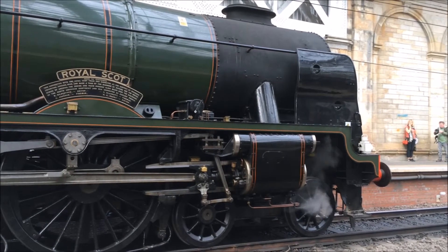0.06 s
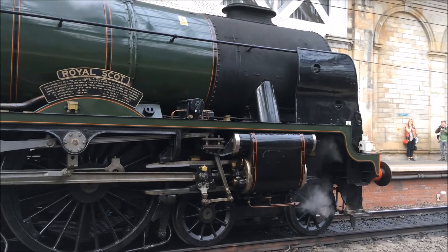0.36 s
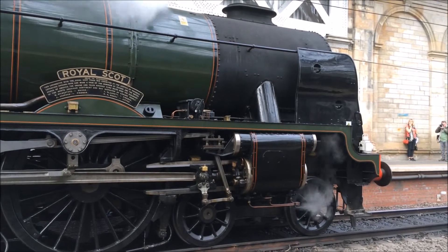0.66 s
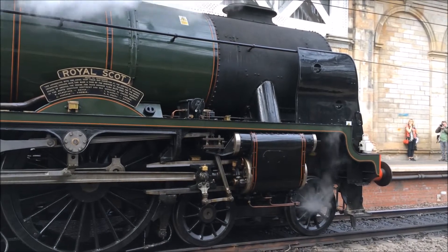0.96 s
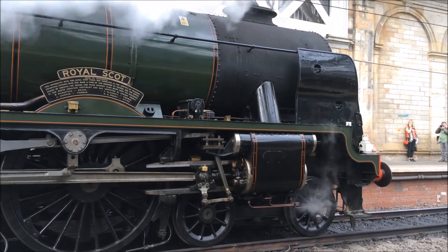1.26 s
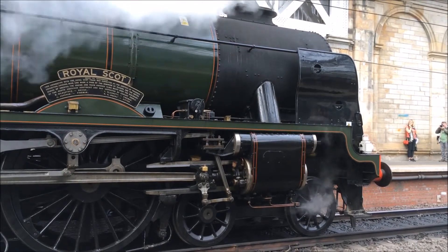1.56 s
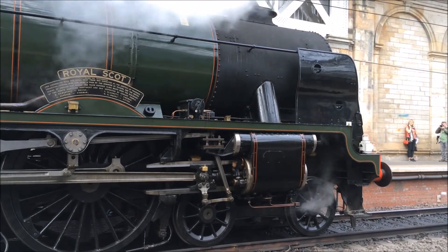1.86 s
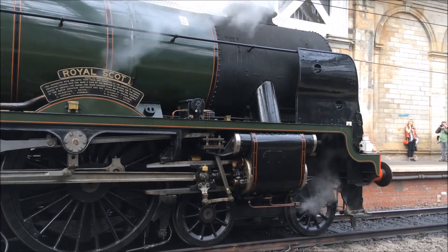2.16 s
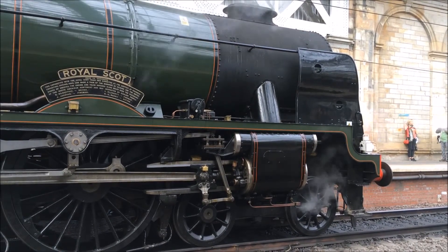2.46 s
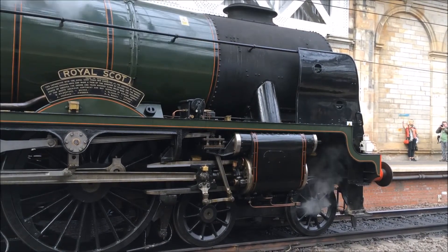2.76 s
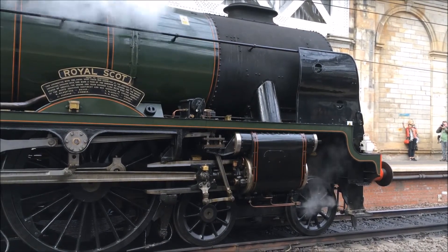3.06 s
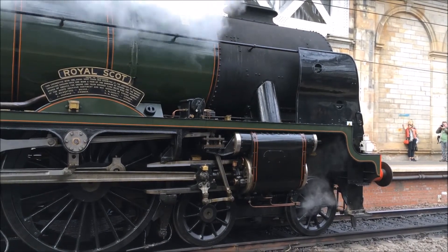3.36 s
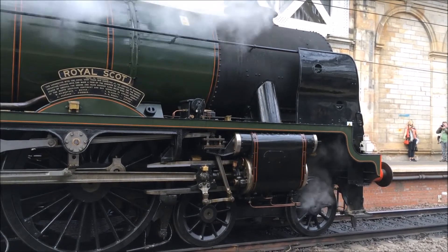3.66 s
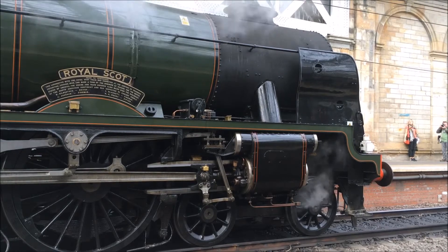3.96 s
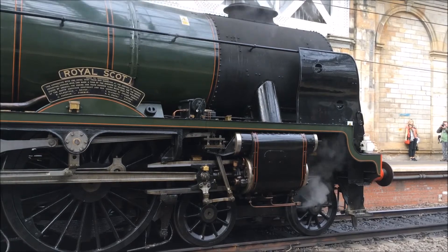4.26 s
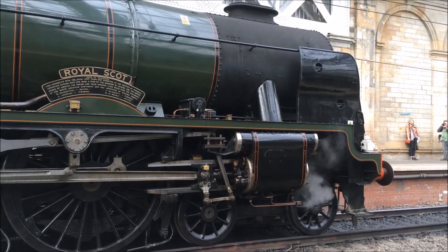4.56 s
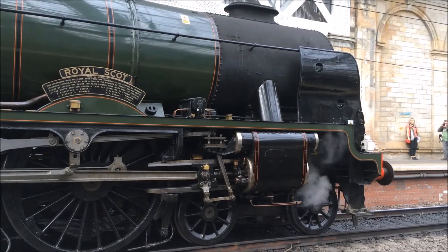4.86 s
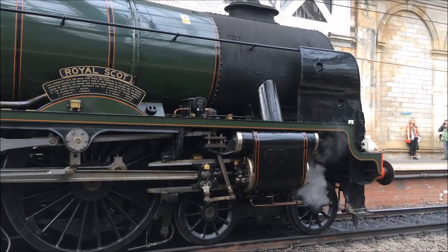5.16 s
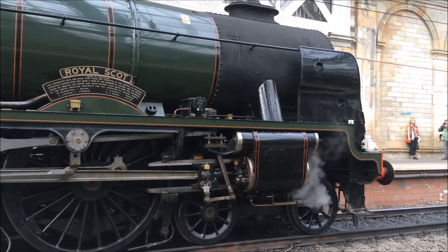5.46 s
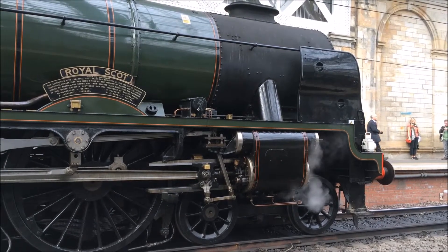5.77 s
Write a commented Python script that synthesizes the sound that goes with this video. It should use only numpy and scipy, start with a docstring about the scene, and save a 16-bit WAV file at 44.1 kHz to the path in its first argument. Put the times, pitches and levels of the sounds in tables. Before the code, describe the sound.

A low steam whistle alternates between a rough, hissing roar and a clear note, ringing through a station before the engine idles softly.

```python
"""A standing steam locomotive sounds its deep whistle, a stopped pipe, under a station roof.
Twice it is overblown: the note goes sharp and breaks up in a roar of steam; between and after,
it speaks clearly. The valve shuts, the station rings on, and the gain control lets up the idling
engine: boiler rumble, a leak and spurts at the cylinder, a few soft puffs.
Now and then the treble dips briefly."""
import sys
import numpy as np
from scipy import signal
from scipy.fft import rfft, irfft, next_fast_len
from scipy.io import wavfile
from scipy.ndimage import uniform_filter1d

SR = 44100
rng = np.random.default_rng(int(sys.argv[2]) if len(sys.argv) > 2 else 0)


def pcm_store(signal):
    """Save signal as 16-bit PCM."""
    levels = np.round(np.clip(np.atleast_2d(signal), -1, 1) * 32767)
    wavfile.write(sys.argv[1], SR, levels.astype(np.int16).T)


N = 261513
TIME = np.arange(N) / SR
SHUT_S = 3.43   # the whistle valve shuts
BREAK_S = 0.054   # how fast the note breaks when overblown
JET_RISE_S, JET_FALL_S = 0.12, 0.32   # the jet swells before the break and dies after the note returns


def from_db(db):
    """Decibels to gain."""
    return 10 ** (np.asarray(db) / 20)


def rms_one(x):
    """Scale to unit rms."""
    return x / np.sqrt(np.mean(x ** 2) + 1e-20)


def at_hz(points, hz):
    """Read a curve on a log-frequency axis."""
    freqs, values = np.transpose(points)
    return np.interp(np.log(hz + 1e-9), np.log(freqs), values)


def drift(rate_hz):
    """Smooth random modulation with a spread of 1."""
    step, warm_up = 20, 4000
    pole = np.exp(-2 * np.pi * rate_hz * step / SR)
    noise = rng.standard_normal(N // step + warm_up + 2)
    slow = signal.lfilter([1], [1, -2 * pole, pole * pole], noise)[warm_up:]
    return np.interp(np.arange(N) / step, np.arange(len(slow)), rms_one(slow))


def turbulence(spectrum, flutter_db, flutter_hz):
    """Coloured noise of rms 1 whose level flutters."""
    size = next_fast_len(N)
    colour = from_db(at_hz(spectrum, np.fft.rfftfreq(size, 1 / SR)))
    noise = irfft(rfft(rng.standard_normal(size)) * colour, size)[:N]
    return rms_one(noise * from_db(flutter_db * drift(flutter_hz)))


def held(spans, rise_s, fall_s):
    """Gate: 1 during each span, with a ramp up before it and a ramp down after it."""
    ramps = [np.minimum(1 + (TIME - start) / rise_s, 1 - (TIME - end) / fall_s)
             for start, end, *_ in spans]
    return np.clip(np.max(ramps, axis=0), 0, 1)


def bursts(rows, rise_s, decay_s):
    """Envelope of short gusts: each swells to its peak and dies away."""
    return sum(from_db(db) * np.clip(1 + (TIME - at) / rise_s, 0, 1)
               * np.exp(-np.maximum(TIME - at, 0) / decay_s) for at, db in rows)


def between(overblown, clear_db, blown_db):
    """Slide from the clear level to the overblown one."""
    return clear_db + (blown_db - clear_db) * overblown


def valve(fade_s, shut_s=SHUT_S):
    """1 while steam flows, fading to 0 at shut_s."""
    return np.clip((shut_s - TIME) / fade_s, 0, 1)


# The boiler's low bed: f/Hz, level/dB
RUMBLE_SPECTRUM = [(25, -29), (55, 1), (90, 2.5), (160, -2.5), (240, -4), (320, -2.5), (600, -12),
                   (1200, -16.5), (2500, -40), (8000, -54)]

def boiler_rumble(level_db=-40.5):
    """The boiler of the resting engine rumbles steadily."""
    return from_db(level_db) * turbulence(RUMBLE_SPECTRUM, flutter_db=0.8, flutter_hz=22)


# The dull colour of a puff: f/Hz, level/dB
PUFF_SPECTRUM = [(110, 5), (250, 5), (400, 13.5), (600, 8), (950, 12.5), (1700, 7), (2400, 0.5), (3500, -7),
                 (8000, -20)]
# Puff cues: t/s, level/dB
PUFFS = [(4.85, -29), (5.05, -41), (5.21, -43.5)]

def steam_puffs():
    """Soft, dull puffs of steam swell and fade."""
    envelope = bursts(PUFFS, rise_s=0.11, decay_s=0.25)
    return envelope * turbulence(PUFF_SPECTRUM, flutter_db=1, flutter_hz=23)


# The leak's thin sizzle: f/Hz, level/dB
LEAK_SPECTRUM = [(500, -9), (2000, 0.5), (3200, -3), (4300, 2.5), (5600, 2.5), (5800, 4), (6000, 0.5),
                 (10000, 0.5), (13000, -0.5), (15500, -3)]
# The hum of the cylinder casing: f/Hz, level/dB
CASING_SPECTRUM = [(120, -27), (195, -8), (232, 3), (265, -14), (400, -31)]
# Spurt cues: t/s, level/dB
SPURTS = [(4.27, -32), (5.82, -34.5)]

def cylinder_leak(leak_db=-42.5, casing_db=-6):
    """Steam leaks and spurts at the cylinder, and the casing hums under it."""
    flow = from_db(leak_db) + bursts(SPURTS, rise_s=0.064, decay_s=0.21)
    sizzle = turbulence(LEAK_SPECTRUM, flutter_db=1.5, flutter_hz=9)
    hum = from_db(casing_db) * turbulence(CASING_SPECTRUM, flutter_db=1, flutter_hz=12)
    return flow * (sizzle + hum)


# The station's ring time to -60 dB: f/Hz, t/s
HALL_T60 = [(100, 7), (400, 3.5), (1200, 3.5), (2500, 2.5), (5000, 1.52), (9000, 0.8), (14000, 0.8)]
# The colour of its diffuse return: f/Hz, level/dB
HALL_RETURN = [(100, -25), (400, -21), (1200, -19.5), (2500, -17.5), (5000, -8), (9000, 0), (14000, -4.5)]
# Slaps off the far walls, relative to the diffuse ring: t/s, level/dB
WALL_ECHOES = [(.13, 17), (0.298, 15), (0.408, 12), (1.5, -5)]

def station(x, build_s=0.016, scatter_s=0.095, echo_cut_hz=3500, waver_s=0.00018):
    """A diffuse ring that loses its treble first; far walls send back dull, scattered echoes."""
    length = 3 * SR
    hz, t, frames = signal.stft(rng.standard_normal(length), SR, nperseg=256)
    hz = hz[:, None]
    decay = from_db(-60 * t / at_hz(HALL_T60, hz)) * (1 - np.exp(-t / build_s))
    decay /= np.sqrt(np.mean(decay ** 2, axis=1, keepdims=True) * length)
    echoes = sum(from_db(db) * np.exp(-((t - at) / scatter_s) ** 2) for at, db in WALL_ECHOES)
    dull_echoes = echoes / (1 + (hz / echo_cut_hz) ** 2)
    colour = from_db(at_hz(HALL_RETURN, hz))
    response = signal.istft(frames * decay * (1 + dull_echoes) * colour, SR)[1]
    # sound bound for the roof crosses the hot plume, so its travel time wavers
    rising = np.interp(TIME + waver_s * drift(9), TIME, x)
    return signal.fftconvolve(rising, response)[:N]


# Brief holes in the treble: t/s, length/s, lower edge f/Hz
TREBLE_DIPS = [(0.206, 0.01, 2860), (0.474, 0.0048, 3360), (0.989, 0.005, 3030), (1.644, 0.0092, 4070),
               (2.351, 0.017, 4080), (3.013, 0.012, 4000), (4.084, 0.016, 5000), (4.757, 0.0082, 2400),
               (5.526, 0.034, 1410)]

def treble_dips(x, depth_db=17.5):
    """The treble ducks for a moment now and then."""
    hz, t, frames = signal.stft(x, SR, nperseg=256)
    dipped = 0
    for at, length, edge_hz in TREBLE_DIPS:
        treble = 1 - 1 / (1 + (hz / edge_hz) ** 4)
        moment = np.exp(-(2 * (t - at) / length) ** 4)
        dipped += np.outer(treble, moment)
    return signal.istft(frames * from_db(-depth_db * dipped), SR)[1][:N]


# Overblown blasts: note breaks t/s, note returns t/s, extra pressure level/dB
BLASTS = [(0.0, 1.377, 3.5), (2.441, 3.155, 3)]

def steam_pressure(opening_s=1.22, opening_db=24, ebb_s=0.45):
    """Gain of the steam supply: the valve is eased open, and each blast pushes harder, then ebbs."""
    surge_db = sum(db * held([(start, end)], BREAK_S, ebb_s) for start, end, db in BLASTS)
    return from_db(surge_db - opening_db * np.clip(1 - TIME / opening_s, 0, 1))


# The jet's bright top: f/Hz, level/dB
HISS_SPECTRUM = [(200, -16), (550, 1), (900, -5), (1600, 4.5), (2600, 1), (4000, 2), (6500, -0.5),
                 (10500, -3.5), (12800, -3), (15000, -4.5)]

def jet_hiss():
    """The steam jet hisses, louder once the note breaks."""
    level_db = between(held(BLASTS, BREAK_S, JET_FALL_S), clear_db=-1.5, blown_db=10)
    return from_db(level_db) * turbulence(HISS_SPECTRUM, flutter_db=2.6, flutter_hz=12.6)


# The jet's low body: f/Hz, level/dB
ROAR_SPECTRUM = [(25, -26), (60, -4), (120, 0), (280, -1.5), (520, 4), (720, 0.5), (1000, -1), (2000, -21),
                 (4000, -23.5), (15000, -27)]
# Spits while the note is clear: t/s, level/dB
SPITS = [(1.70, 2), (1.85, -8), (2.0, -8), (3.3, 4.5)]

def jet_roar(overblown):
    """The jet roars through each blast and spits in the clear stretches."""
    roaring = 1 - (1 - overblown) ** 2   # comes early and stays late
    swell = from_db(between(roaring, clear_db=-15.5, blown_db=5.5))
    spits = bursts(SPITS, rise_s=0.02, decay_s=0.021)
    return (swell + spits) * turbulence(ROAR_SPECTRUM, flutter_db=1.8, flutter_hz=19)


# The overblown fundamental sinks into the steam: start t/s, end t/s
CHOKES = [(.12, 0.2), (.79, 0.86), (1.05, 1.35), (2.5, 2.86)]

def fundamental_gain(sputter_db=3.5, choke_db=15):
    """The pipe's lowest mode is strong when clear; overblown, it weakens, sputters and chokes."""
    broken = held(BLASTS, BREAK_S, fall_s=0.021)
    level_db = between(broken, clear_db=13, blown_db=7) + sputter_db * broken * drift(14)
    return from_db(level_db - choke_db * held(CHOKES, rise_s=0.027, fall_s=0.027))


# The pipe's weak partials: harmonic number, level/dB at rest pitch, level/dB pushed sharp
OVERTONES = [(2, -36, -23), (4, -33.5, -23.5), (5, -28.5, -24), (6, -27, -23.5), (7, -31, -27.5),
             (8, -33, -29), (9, -37, -34.5), (10, -41, -37.5), (11, -41, -35.5)]
# The upper register catches: start t/s, end t/s
CATCHES = [(1.493, 2.173), (3.339, 3.5)]

def upper_partials(phase, sharp, rough, closing, overtone_db=18.5, flutter_db=4.6, flare_db=5):
    """The upper modes catch, flare and settle; overblowing and the closing valve fray them."""
    caught = held(CATCHES, rise_s=0.03, fall_s=0.08)
    flare = from_db(flare_db * bursts([(start, 0) for start, _ in CATCHES], rise_s=0.03, decay_s=0.07))
    partials = [(3, from_db(1 + 8 * caught))]   # the twelfth jumps 8 dB once caught
    for harmonic, rest_db, sharp_db in OVERTONES:
        level_db = overtone_db + between(sharp, rest_db, sharp_db) + flutter_db * drift(5.3)
        partials.append((harmonic, from_db(level_db) * valve(fade_s=0.03)))   # weak partials die first
    fray = np.clip(0.028 + 0.83 * np.maximum(rough * (1 - caught), closing), 0, 1)
    tone = np.zeros(N)
    for harmonic, gain in partials:
        rasp = (drift(45) + 1j * drift(45)) / np.sqrt(2)   # shakes both level and phase
        wobble = np.sqrt(1 - fray ** 2) + fray * rasp
        tone += (flare if harmonic > 2 else 1) * gain * np.imag(wobble * np.exp(1j * harmonic * phase))
    return tone


# The pipe's pitch, which climbs with the steam pressure: t/s, f/Hz
PITCH_CURVE = [(0, 381.2), (0.12, 396.7), (0.3, 396.1), (0.5, 403.3), (0.9, 404.6), (1.25, 409.2),
               (1.42, 404.5), (1.52, 394.3), (1.67, 385.3), (2.0, 385.2), (2.28, 385.3), (2.37, 389.9),
               (2.46, 400.0), (2.68, 411.0), (2.98, 416.7), (3.12, 403.7), (3.25, 399.5), (3.38, 397.1)]

def whistle(overblown, rest_hz=383.8, sharp_span_hz=11, sag_hz=10.38, sag_db=9.5):
    """A stopped pipe: odd modes lead; pushed sharp it gains even partials, and overblowing shakes it."""
    rough = overblown ** 2   # the more steam misses the lip, the rougher the note
    closing = 1 - valve(fade_s=0.1288)   # the jet loses its grip: the note sinks, flattens and splutters
    pitch_hz = np.interp(TIME, *np.transpose(PITCH_CURVE)) - sag_hz * closing
    sharp = np.clip((pitch_hz - rest_hz) / sharp_span_hz, 0, 1)
    low_gain = fundamental_gain()
    jitter = (0.0011 + 0.01118 * rough + 0.0177 * closing) * drift(56.5)
    phase = 2 * np.pi * np.cumsum(pitch_hz * (1 + jitter)) / SR
    tone = low_gain * np.sin(phase) + upper_partials(phase, sharp, rough, closing)
    return np.sqrt(2) * tone * from_db(-sag_db * closing) * valve(fade_s=0.15, shut_s=SHUT_S + 0.14)


def scene(hiss_send_db=-6.5, roar_send_db=-18, beat_db=3.5):
    """Whistle and jet with the station's answer, over the idling engine; the same in both ears."""
    overblown = held(BLASTS, JET_RISE_S, JET_FALL_S)
    pressure = steam_pressure()
    flow = pressure * valve(fade_s=0.034)
    roar = flow * jet_roar(overblown)
    hiss = flow * jet_hiss()
    note = pressure * whistle(overblown)
    note_ring = station(note)
    steam_ring = station(from_db(hiss_send_db) * hiss + from_db(roar_send_db) * roar)
    # once the note stops, its echoes beat against each other: a random wobble in the tail
    beating = from_db(beat_db * drift(11.8) * (1 - valve(fade_s=0.12)))
    hall = steam_ring + note_ring * beating
    engine = cylinder_leak() + boiler_rumble() + steam_puffs()
    return np.tile(treble_dips(engine + hall + hiss + roar + note), (2, 1))


def gain_control(x, limit_db=-6.5, detector_s=0.018, release_db_per_s=60, squeeze=0.96):
    """Loud peaks turn the gain down at once; it comes back at a steady rate."""
    peaks = uniform_filter1d(x[0] ** 4, int(detector_s * SR))
    level_db = 5 * np.log10(np.abs(peaks) + 1e-12)
    over_db = np.maximum(level_db - limit_db, 0)
    release_db = release_db_per_s * TIME
    held_db = np.maximum.accumulate(over_db + release_db) - release_db
    return x * from_db(-squeeze * held_db)


def record(dry, cutoff_hz=15380):
    """Gain control, rounded peaks, and a steep cut at the top."""
    levelled = gain_control(dry)
    rounded = levelled / (1 + levelled ** 8) ** (1 / 8)
    return signal.sosfilt(signal.ellip(12, 0.1, 70, cutoff_hz, fs=SR, output="sos"), rounded)


dry = scene()
out = record(dry)
pcm_store(out)
```